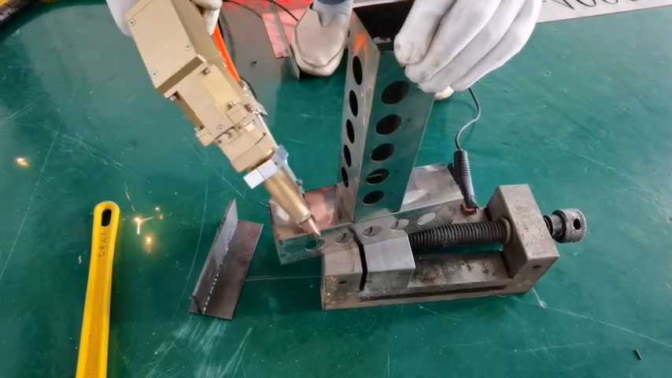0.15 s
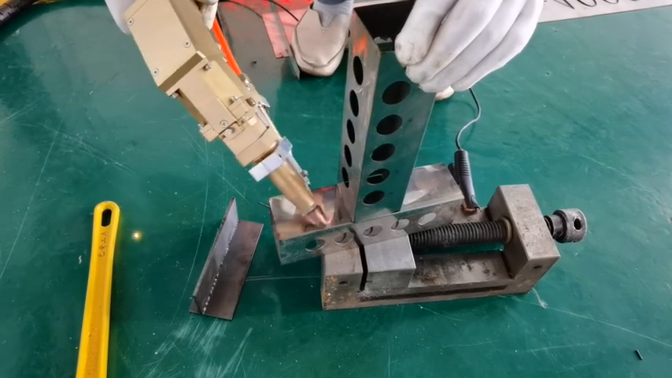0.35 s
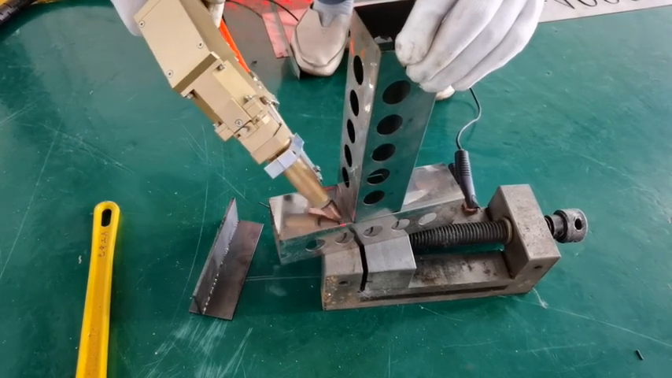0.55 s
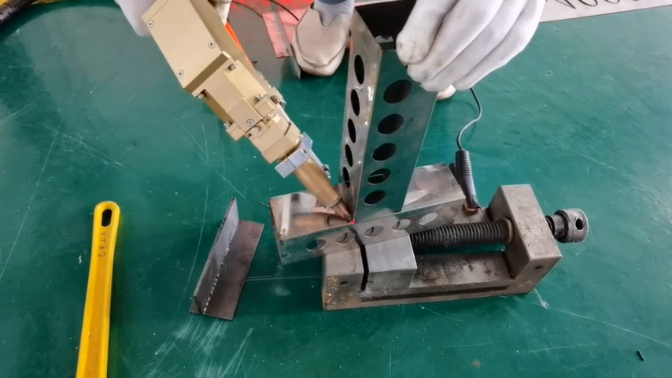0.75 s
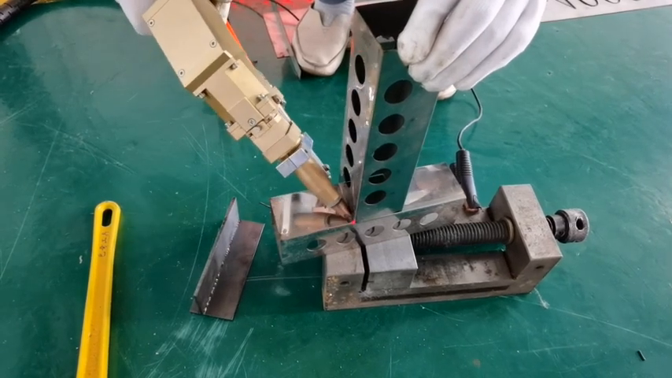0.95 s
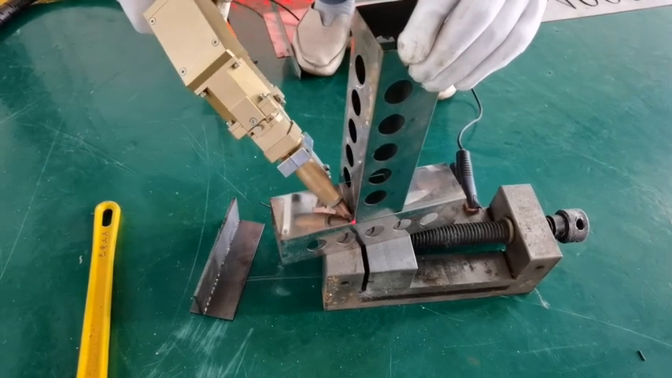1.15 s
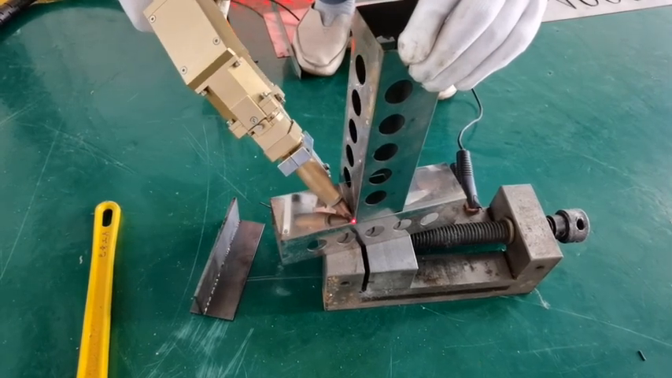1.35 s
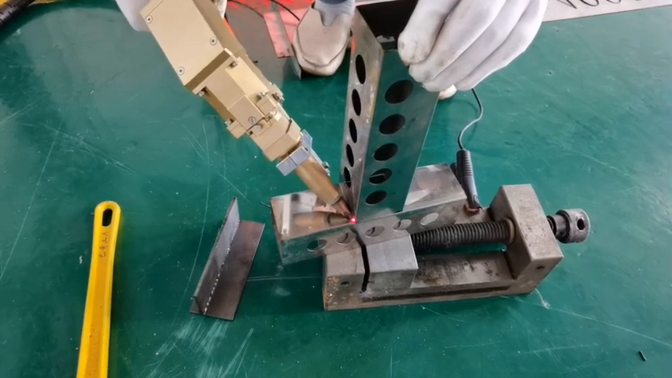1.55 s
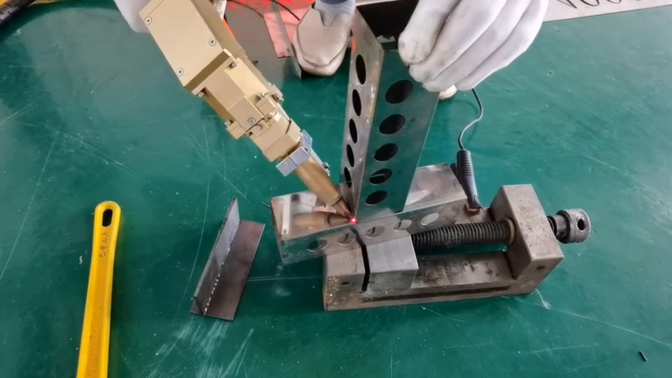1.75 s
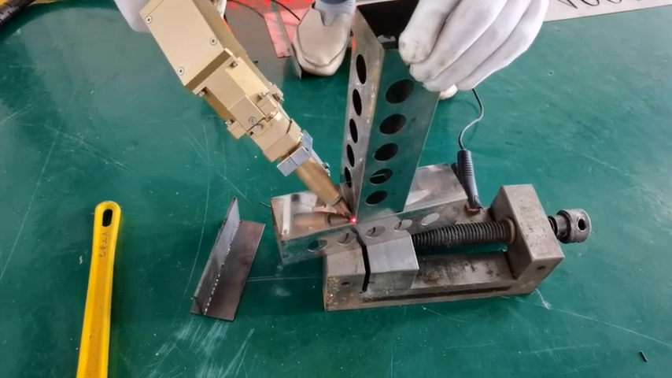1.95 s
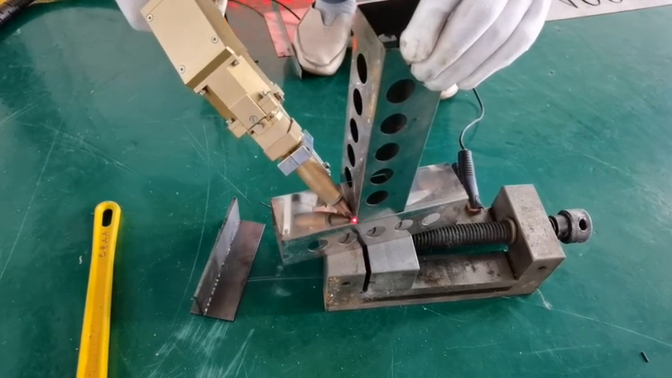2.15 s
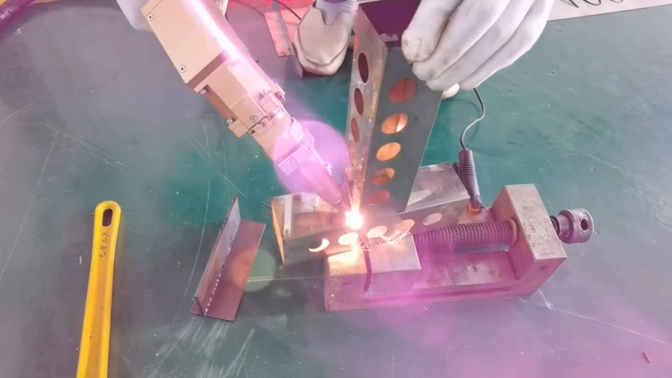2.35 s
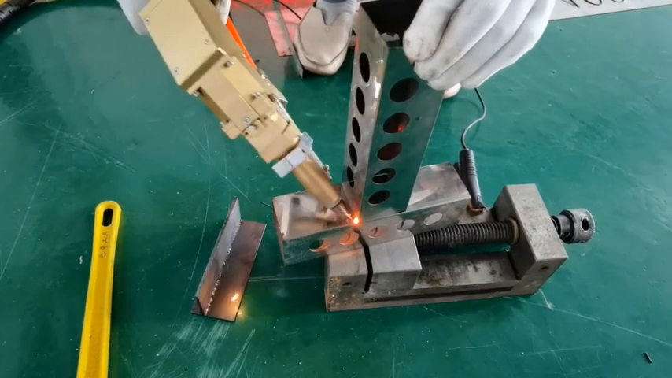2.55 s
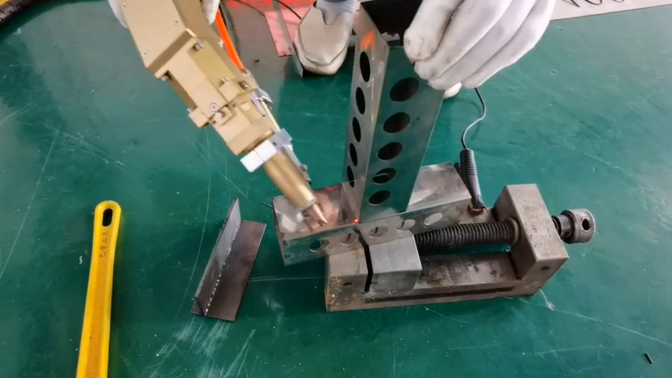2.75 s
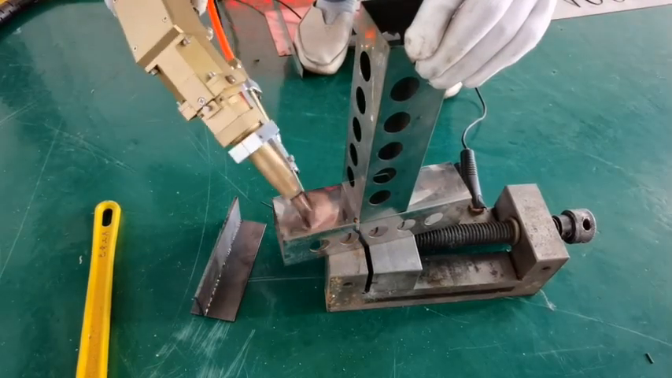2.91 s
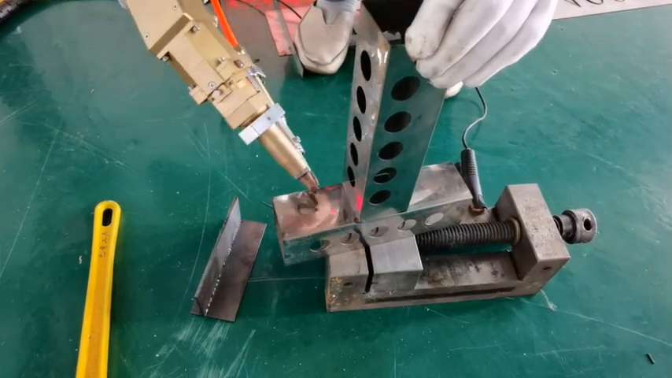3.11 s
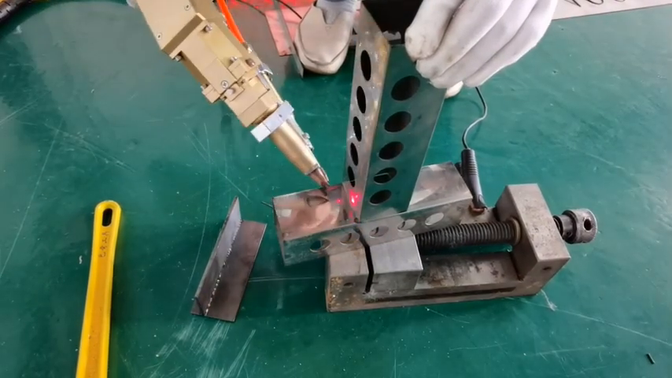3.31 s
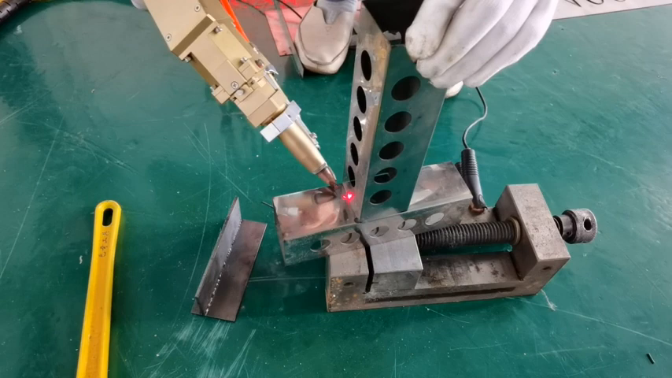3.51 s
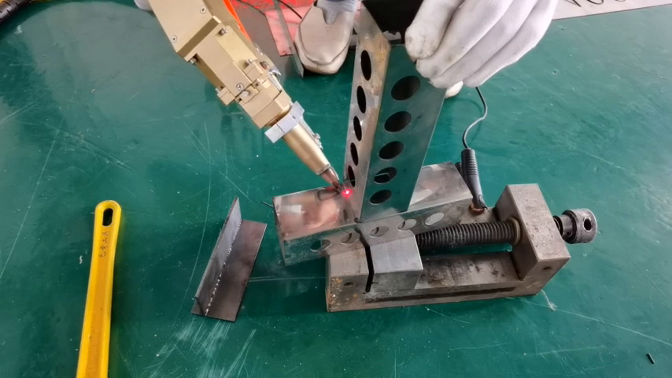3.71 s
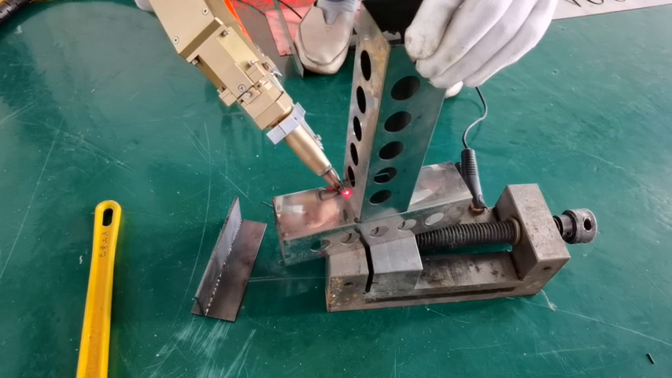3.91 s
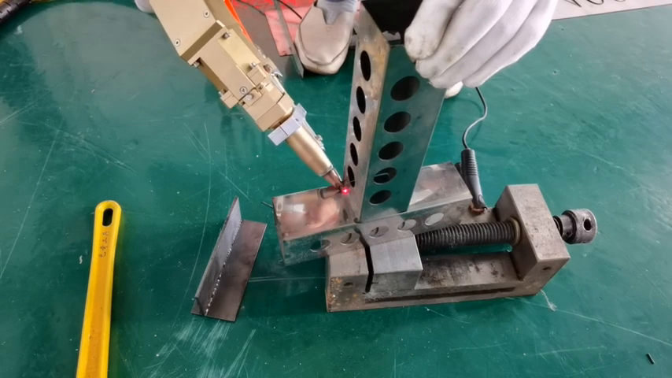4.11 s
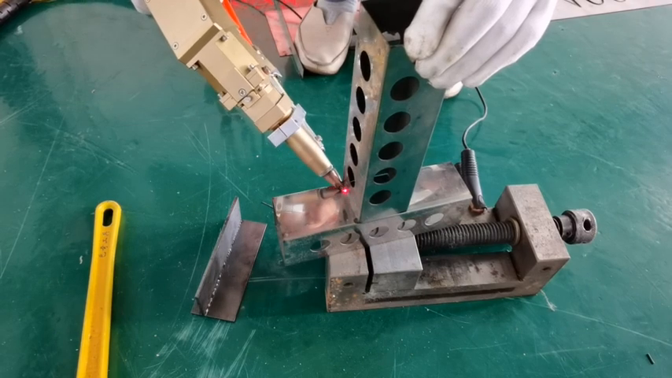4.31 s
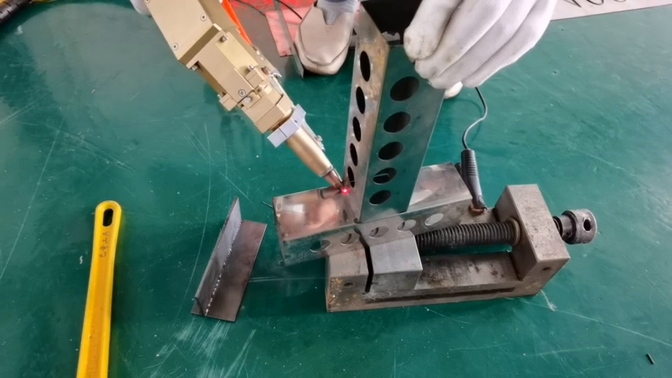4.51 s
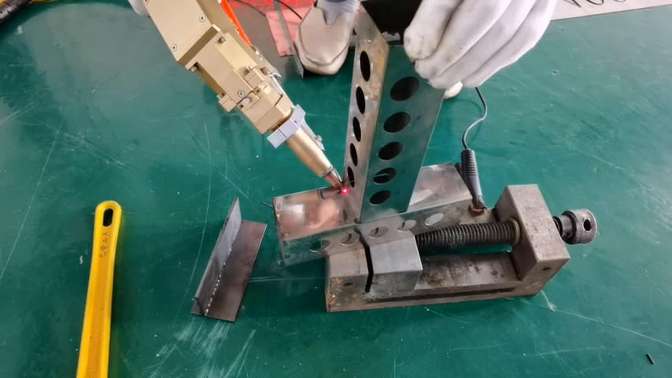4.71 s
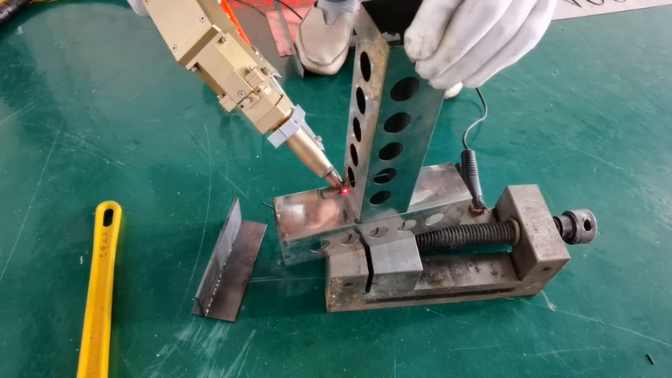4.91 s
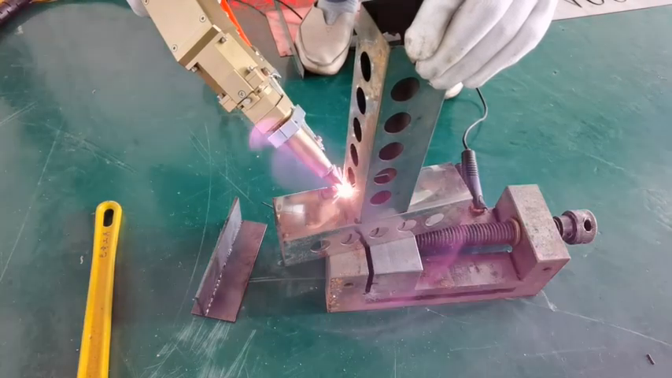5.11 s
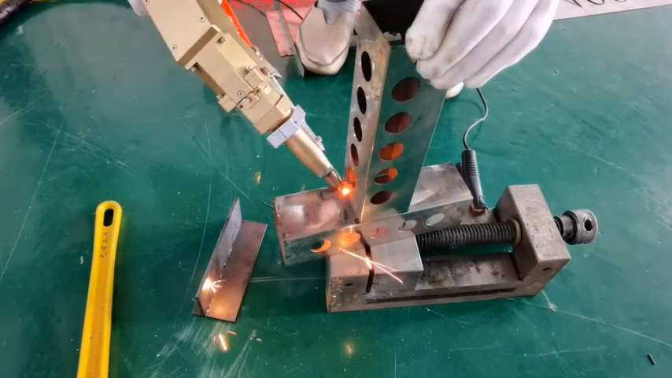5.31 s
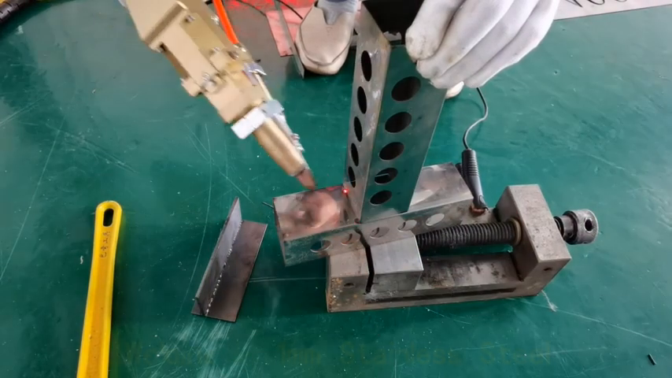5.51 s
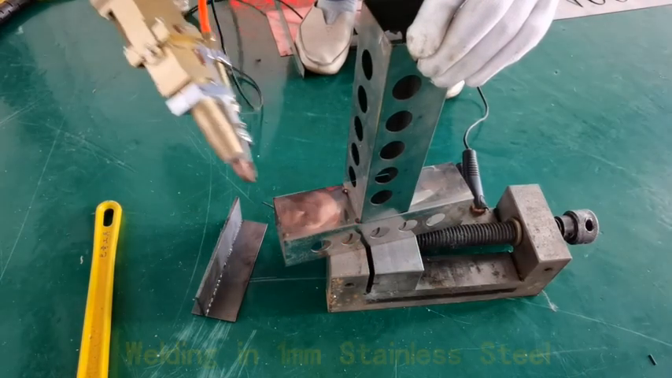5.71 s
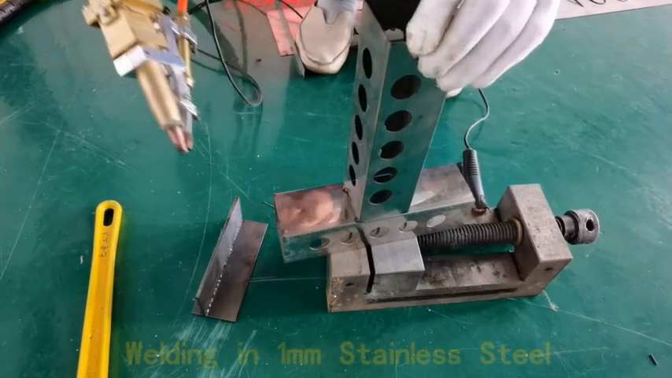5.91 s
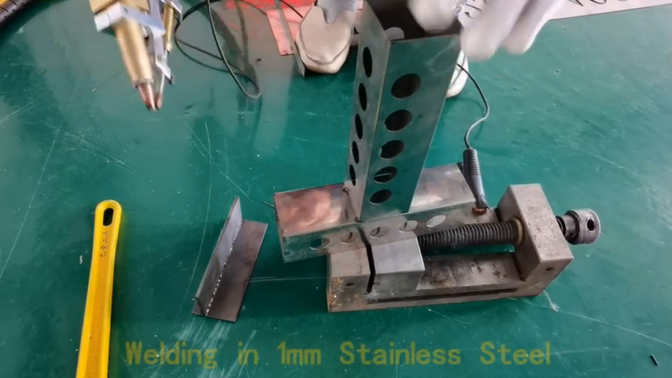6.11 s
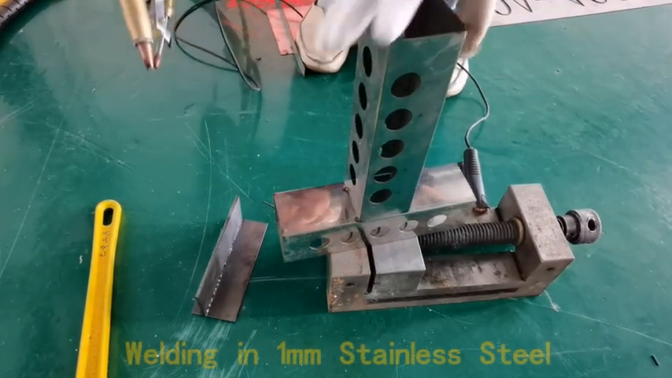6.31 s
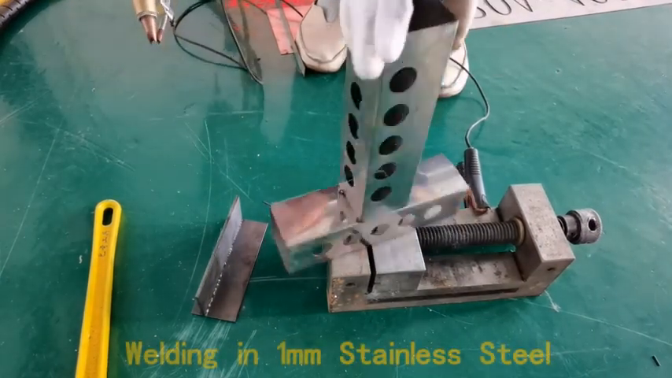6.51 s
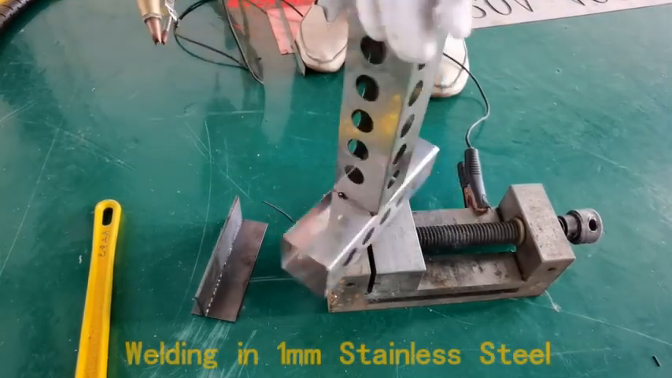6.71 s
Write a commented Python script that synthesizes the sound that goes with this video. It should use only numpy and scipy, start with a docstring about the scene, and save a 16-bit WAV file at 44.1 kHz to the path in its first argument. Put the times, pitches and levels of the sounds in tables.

```python
"""Laser tack welding in a workshop

A handheld laser welder makes two tacks between a steel tube and a plate, each a run of enveloped noise puffs,
about fifty a second: a thin sizzle, then a deeper roar with snaps of spatter. Filtered noise makes the
shielding gas and the machine rumble. The recorder ducks the room under each tack and stays turned down.
At the end the tube scrapes, groans and rings as it is lifted off the vice: random slips excite its modes."""
import sys
import numpy as np
from scipy import signal
from scipy.fft import rfft, irfft, next_fast_len
from scipy.io import wavfile
from scipy.ndimage import uniform_filter1d, map_coordinates

SR = 44100
rng = np.random.default_rng(int(sys.argv[2]) if len(sys.argv) > 2 else 0)


def unload_wav(signal):
    """Save mono or channel-first audio to the path in sys.argv[1] as 16-bit WAV at rate SR, clipped to [-1, 1]."""
    wavfile.write(
        sys.argv[1],
        SR,
        np.round(np.clip(np.atleast_2d(signal).T, -1, 1) * 32767).astype(np.int16),
    )


N = 297719
TIME = np.arange(N) / SR
FFT_SIZE = next_fast_len(N, real=True)
FREQS = np.maximum(np.fft.rfftfreq(FFT_SIZE, 1 / SR), 1)
# Colour tables are relative: each noise is scaled to rms 1. noise() also multiplies their freq_hz by pitch.


# Tack welds; simmer is the hiss between pulses, sizzle_pitch a frequency factor:
# start_s, pulse_rate_hz, level_db, simmer_db, simmer_peak_after_s, sizzle_pitch, singing_db, singing_lasts_s
TACKS = [(2.31, 50.2, 0, -2, 0.11, 0.985, -19.5, 0.2), (5.165, 53.9, 0, -5, 0.082, 0.956, -17.5, 0.2)]
# Laser pulses per tack: count
PULSE_COUNTS = (8, 9)
# Growth and decay of each vapour part as the melt deepens: peak_db, peak_after_s, rise_db_per_s, fall_db_per_s, boil_db
ROAR_COURSE = (-13, 0.19, 59, 20, 3)
SPIT_COURSE = (-8.3, 0.05, 290, 32, 2)
SIZZLE_COURSE = (-6, 0.2, 10, 57, 1.2)
# Vapour noise colours: freq_hz, density_db_per_hz
ROAR_COLOUR = [(700, -51), (950, -24), (1250, -20.5), (1700, -1.5), (2050, -7.5), (2400, 1), (3200, 1),
               (4200, 4.5), (5000, 0.5), (7500, -42)]
SPIT_COLOUR = [(3300, -12), (5300, 3), (6200, 2.5), (6700, 3.5), (8400, 3.5), (9700, 3.5), (11000, 11),
               (13200, -21), (15500, -1)]
SIZZLE_COLOUR = [(8000, -33), (10000, 3), (11100, 13.5), (12000, 8), (12600, 3), (13400, -7), (15800, -6)]
# Gap between nozzle and work, one list per tack as the tool is held differently: freq_hz, width_hz, lift_db
GAP_RESONANCES = [
    [(2050, 200, -7), (2740, 200, 7), (4340, 69, 9), (4650, 340, -7), (5530, 170, 4), (6270, 440, -14),
     (6750, 200, 9), (7800, 250, 5), (9700, 300, 0), (10400, 710, -16), (12600, 320, 5), (13300, 600, -6)],
    [(1590, 240, 1.5), (2080, 250, -11), (2350, 180, 5), (2960, 300, 1), (3900, 900, 3.5), (6700, 240, 6.5),
     (8850, 510, 7.5), (10000, 250, 0)],
]
# Weld turbulence: depth_db, band_hz, changes_per_s
WELD_PATCHES = (2.6, 450, 45)


def tacks(low_edge_hz=1050):
    """Each laser pulse blows a short vapour jet out of the melt; drops spatter out as well."""
    jets = 0
    for tack, count, resonances in zip(TACKS, PULSE_COUNTS, GAP_RESONANCES):
        start_s, rate_hz, level_db, simmer_db, simmer_s, sizzle_pitch, *_ = tack
        age_s = TIME - start_s
        roar = jet(age_s, ROAR_COURSE, noise(ROAR_COLOUR))
        spit = jet(age_s, SPIT_COURSE, noise(SPIT_COLOUR))
        sizzle = jet(age_s, SIZZLE_COURSE, noise(SIZZLE_COLOUR, sizzle_pitch))
        envelope = pulses(start_s, rate_hz, count, simmer_db, simmer_s)
        weld = from_db(level_db) * envelope * (roar + spit + sizzle) + spatter(start_s)
        jets = jets + nozzle_gap(weld, resonances)
    high_pass = signal.butter(4, low_edge_hz, "high", fs=SR, output="sos")
    return signal.sosfilt(high_pass, patchy(jets, *WELD_PATCHES))


def jet(age_s, course, hiss, boil_per_s=700):
    """One vapour part: its level follows the melt's course and boils unevenly."""
    *shape, boil_db = course
    return from_db(course_db(age_s, *shape) + boil_db * drift(boil_per_s)) * hiss


# Puff power time scales: rise_s, fall_s
PUFF_RISE_FALL_S = (.0032, .0032)
# Simmer build-up and fade: rise_db_per_s, fall_db_per_s
SIMMER_RISE_FALL_DB_PER_S = (91, 242)


def pulses(start_s, rate_hz, count, simmer_db, simmer_s, uneven_db=1.3):
    """Tack envelope: evenly spaced puffs, apart at first, run together by simmer in mid-tack, apart at the end."""
    times_s = start_s + np.arange(count) / rate_hz
    simmer_gain = from_db(course_db(TIME - start_s, simmer_db, simmer_s, *SIMMER_RISE_FALL_DB_PER_S))
    simmer_power = simmer_gain ** 2 * (TIME > start_s) * (TIME < times_s[-1])
    strengths = from_db(uneven_db * rng.standard_normal(count))
    puff_power = sum(g ** 2 * puff(s, *PUFF_RISE_FALL_S) for s, g in zip(times_s, strengths))
    return np.sqrt(simmer_power + puff_power)


# Melt drops: peak_s, level_db, fall_s, pitch_hz
SPATTERS = [(2.373, -18, 0.0018, 3700), (2.393, -12.5, .003, 3520), (2.435, -7, 0.0023, 1400),
            (2.447, -8.5, .002, 4170), (2.46, -7, 0.0041, 5000), (5.164, -19.5, 0.0065, 3940),
            (5.217, -18.5, 0.0019, 1600), (5.245, -14, 0.003, 4280), (5.257, -9.5, 0.0039, 1250),
            (5.277, -4, 0.0022, 3760), (5.298, -7, .0025, 3260), (5.318, -6.5, 0.0027, 2450)]
# Spatter colour: freq_hz, density_db_per_hz
SPATTER_COLOUR = [(800, -48), (1250, -3), (2000, -10.5), (2500, -2.5), (4000, -3), (5400, -0.5),
                  (6800, -4.5), (9000, -3.5), (15000, -3)]


def spatter(start_s, swell_s=0.002, crackle_db=4, width_hz=450, lift_db=7):
    """Drops burst out of the melt: short ragged noise snaps, each with its own resonance."""
    crackle = from_db(crackle_db * drift(1500)) * noise(SPATTER_COLOUR)
    snaps = 0
    for peak_s, level_db, fall_s, pitch_hz in SPATTERS:
        if abs(peak_s - start_s) < 1:   # drops of this tack only
            snap = from_db(level_db) * np.sqrt(puff(peak_s, swell_s, fall_s)) * crackle
            snaps = snaps + nozzle_gap(snap, [(pitch_hz, width_hz, lift_db)])
    return snaps


def nozzle_gap(x, resonances):
    """Parallel resonances: the air gap lifts a few pitches and cancels others."""
    out = x
    for hz, width_hz, lift_db in resonances:
        band = signal.lfilter(*signal.iirpeak(hz, hz / width_hz, fs=SR), x)
        out = out + (from_db(lift_db) - 1) * band
    return out


# Flares of the singing after the first tack: peak_s, level_db, width_s
FLARES = [(2.508, -20, .004), (2.533, -19.5, .008)]
# Singing colour: freq_hz, density_db_per_hz
SING_COLOUR = [(3000, -29), (3900, -15), (4350, -16), (4900, -28), (6500, -18), (9200, -21), (10300, -15),
               (10750, -19.5), (11100, 1.5), (11600, 1), (12200, -7), (13400, -30), (15000, -3),
               (15800, -31)]
# Singing turbulence: depth_db, band_hz, changes_per_s
SING_PATCHES = (2.5, 500, 70)


def singing(full_after_s=0.0071, rise_db_per_s=264, sag_db_per_s=3, fall_db_per_s=300):
    """Thin high hiss at the weld spot: fades in quickly, outlasts the tack, flares up after the first."""
    shape = sum(from_db(db) * np.sqrt(puff(s, width_s, width_s)) for s, db, width_s in FLARES)
    for start_s, *_, singing_db, lasts_s in TACKS:
        age_s = TIME - start_s
        held_db = course_db(age_s, singing_db, full_after_s, rise_db_per_s, sag_db_per_s)
        shape = shape + from_db(held_db - fall_db_per_s * np.maximum(age_s - lasts_s, 0))
    return shape * rms_one(patchy(noise(SING_COLOUR), *SING_PATCHES))


# Dull trigger knock and ignition snap, ahead of each tack: lead_s, level_db, decay_s
TRIGGER = (.083, -42, 0.046)
IGNITION = (0.00308, -20.5, 0.002)
# Click colour: freq_hz, density_db_per_hz
CLICK_COLOUR = [(400, 2), (800, 6), (1200, 7), (1650, 3), (2200, 5), (5000, -35), (12000, -35)]


def clicks():
    """Trigger and beam ignition: noise bursts with instant onset and exponential decay."""
    shape = 0
    for start_s, *_ in TACKS:
        for lead_s, level_db, decay_s in (TRIGGER, IGNITION):
            age_s = TIME - (start_s - lead_s)
            shape = shape + from_db(level_db) * (age_s >= 0) * np.exp(-np.maximum(age_s, 0) / decay_s)
    return shape * noise(CLICK_COLOUR)


# Drag off the vice, before the gains in tube(): time_s, scrape_rel_db, groan_rel_db
DRAG = [(6.46, -58, -71), (6.482, -39, -63), (6.504, -47, -53), (6.522, -40, -45), (6.59, -45, -46),
        (6.655, -59, -41), (6.695, -47, -50), (6.725, -70, -41), (6.75, -64, -46)]
# Squeaks as the tube breaks loose: peak_s, level_db, rise_s, fall_s, from_hz, to_hz
SQUEAKS = [(6.527, -35.5, 0.007, 0.0067, 2050, 1730), (6.555, -42.5, 0.016, 0.013, 2385, 2370),
           (6.58, -39, 0.011, .028, 1930, 1935)]
# Tube modes: freq_hz, rel_db, t60_s
TUBE_MODES = [(1405, -14, 0.22), (1630, 0, 0.05), (1710, -5, 0.035), (1800, -7, 0.28), (1880, -4, .06),
              (1940, -4, 0.46), (1970, -7, 0.056), (2385, -16, 0.09)]
# Low tube modes, the first two a close pair that beats: freq_hz, rel_db, t60_s
GROAN_MODES = [(504.4, 0.5, 0.29), (533, 0.5, 0.33), (1040, -20, .1)]


def tube(slips_per_s=1500, scrape_db=-12, groan_db=6, spread=0.41, catch_db=3, shudder_db=2.0):
    """Steel stick-slip: uneven slips make the tube modes ring and groan, regular ones squeak."""
    scrape, groan = level(DRAG)
    slips = (rng.random(N) < slips_per_s / SR) * from_db(catch_db * drift(60))
    ringing = 0
    for hz, db, t60_s in TUBE_MODES:
        strength = rng.standard_normal(N) + spread * rng.standard_normal((2, N))   # shared + per side
        ringing = ringing + ring(slips * strength * scrape * from_db(scrape_db + db), hz, t60_s)
    low = 0
    for hz, db, t60_s in GROAN_MODES:
        low = low + from_db(db) * rms_one(ring(slips * rng.standard_normal(N), hz, t60_s))
    tones = groan * from_db(groan_db - meter_db(low[None], .04)) * low   # levelled, then shaped by DRAG
    for s, db, rise_s, fall_s, from_hz, to_hz in SQUEAKS:
        hz = np.interp(TIME, [s - 2 * rise_s, s + 2 * fall_s], [from_hz, to_hz])
        tones = tones + from_db(db) * np.sqrt(puff(s, rise_s, fall_s)) * glide(hz, rough=0.0194)
    shuddering = tones[None] * from_db(shudder_db * drift(130))
    return ringing + reflections(shuddering, t60_s=0.13, wet_db=-8)


def glide(hz, rough):
    """Stick-slip tone: a sine with trembling pitch; rms 1."""
    cycles = np.cumsum(hz * (1 + rough * drift(400))) / SR
    return np.sqrt(2) * np.sin(2 * np.pi * cycles)


# Gas colour: freq_hz, density_db_per_hz
GAS_COLOUR = [(900, -13), (1500, -18), (2100, -12.5), (3000, -8.5), (4400, -4), (4800, -9), (5400, -6.5),
              (6400, -1.5), (7500, 0), (8500, -4), (10500, -3), (12500, -5), (13200, -8.5), (15800, -5)]
# Gas turbulence: depth_db, band_hz, changes_per_s
GAS_PATCHES = (2, 300, 25)
# Faint high gas whistles: peak_s, level_db, width_s
WHISTLES = [(1.85, -54, .05), (5.445, -30, .014), (5.72, -46, .05)]
# Whistle colour: freq_hz, density_db_per_hz
WHISTLE_COLOUR = [(14200, -29), (14720, -7), (14850, 0), (14980, -12), (15400, -40)]
# Left-right likeness of the room, also used by machines(): freq_hz, correlation (-1..1)
ROOM_LIKENESS = [(60, 1), (130, 0.96), (290, 0.9), (640, 0.53), (1300, -0.6), (2500, 0.018),
                 (15000, -0.044)]


def gas(gas_db=-30.5, flutter_db=0.5):
    """Steady turbulent shielding gas flow spread through the hall, with brief narrow-band whistles."""
    flow = reflections(coloured(GAS_COLOUR, ROOM_LIKENESS), t60_s=.5, wet_db=-3)
    shape = sum(from_db(db) * np.sqrt(puff(s, width_s, width_s)) for s, db, width_s in WHISTLES)
    whistle = shape * noise(WHISTLE_COLOUR, pitch=1)
    hiss = from_db(gas_db + flutter_db * drift(25)) * rms_one(patchy(flow, *GAS_PATCHES))
    return hiss + stereo_width(whistle)


# Rumble level: time_s, level_db
RUMBLE = [(0, -35), (1.2, -36), (1.72, -34.5), (2.15, -35), (2.55, -32.5), (3.3, -34.5), (4.8, -33.5),
          (6.2, -34.5)]
# Rumble colour: freq_hz, density_db_per_hz
RUMBLE_COLOUR = [(20, -16), (38, -6.5), (60, -6), (100, -1), (135, -7), (185, 0), (240, -12.5), (310, -11),
                 (420, -19), (680, -23), (900, -30.5), (1400, -28.5), (3000, -56)]
# Machine hums, level against the broad rumble: freq_hz, half_width_hz, rel_db, swell_db
HUMS = [(113, 8.5, -7, 1.5), (183.7, 15, -8.5, 3), (280.6, 9.7, -8.5, 2), (1039, 33.5, -19, 4)]
# Surges of the deep drone: peak_s, level_db, width_s
SURGES = [(.5, -29, 0.041), (1.72, -30.5, 0.051), (4.15, -37, 0.17), (4.55, -34.5, 0.17),
          (4.85, -32, 0.034)]
# Surge colour: freq_hz, density_db_per_hz
SURGE_COLOUR = [(55, -23), (85, 3.5), (110, 5), (140, -10.5), (185, -5), (260, -19.5), (450, -44)]


def machines():
    """Fans and pumps: broad rumble, narrow-band hums that swell and fade, a deep surging drone."""
    sound = coloured(RUMBLE_COLOUR, ROOM_LIKENESS)
    for hz, half_width_hz, db, swell_db in HUMS:
        peak = 1 / (1 + ((FREQS - hz) / half_width_hz) ** 2)
        sound = sound + from_db(db + swell_db * drift(11)) * stereo_noise(peak, ROOM_LIKENESS)
    surge_power = sum(from_db(db) ** 2 * puff(s, width_s, width_s) for s, db, width_s in SURGES)
    rumble_gain = from_db(np.interp(TIME, *np.transpose(RUMBLE)))
    return rumble_gain * sound + np.sqrt(surge_power) * coloured(SURGE_COLOUR, ROOM_LIKENESS)


def from_db(db):
    """Decibels to gain."""
    return 10 ** (np.asarray(db) / 20)


def rms_one(x):
    """Scale to unit rms."""
    return x / np.sqrt(np.mean(x ** 2) + 1e-20)


def level(rows):
    """Gain curves from rows (time_s, db, ..), silent before the first and 10 ms after the last."""
    s, *columns = np.transpose(rows)
    active = (TIME >= s[0]) * (TIME <= s[-1] + .01)
    return [from_db(np.interp(TIME, s, db)) * active for db in columns]


def course_db(age_s, peak_db, peak_s, rise_db_per_s, fall_db_per_s):
    """Level that climbs linearly in dB to its peak and falls again."""
    return peak_db - rise_db_per_s * np.maximum(peak_s - age_s, 0) - fall_db_per_s * np.maximum(age_s - peak_s, 0)


def puff(peak_s, rise_s, fall_s):
    """Power of one puff: squared hyperbolic secant around its peak."""
    scale_s = np.where(TIME < peak_s, rise_s, fall_s)
    return 1 / np.cosh(np.clip((TIME - peak_s) / scale_s, -20, 20)) ** 2


def drift(rate_hz):
    """Random curve with rate_hz new values a second, linearly joined; rms 1."""
    knots = rng.standard_normal(N // 8)
    return rms_one(np.interp(TIME * rate_hz, np.arange(len(knots)), knots))


def at_hz(points):
    """Read a (freq_hz, value) table on a log-frequency axis."""
    hz, value = np.transpose(points)
    return np.interp(np.log(FREQS), np.log(hz), value)


def noise(colour, pitch=0.95):
    """Mono noise with a spectrum whose frequencies are multiplied by pitch; rms 1."""
    shifted = [(hz * pitch, db) for hz, db in colour]
    white = rfft(rng.standard_normal(2 * (len(FREQS) - 1)))
    return rms_one(irfft(from_db(at_hz(shifted)) * white)[:N])


def stereo_noise(gain, likeness):
    """Stereo noise with gain and left-right correlation per frequency; rms 1."""
    mid, side = rfft(rng.standard_normal((2, 2 * (len(FREQS) - 1))))
    alike = np.clip(at_hz(likeness), -1, 1)
    left_right = np.sqrt(1 + alike) * mid + np.sqrt(1 - alike) * side * [[1], [-1]]
    return rms_one(irfft(gain * left_right)[:, :N])


def coloured(colour, likeness):
    """Stereo noise following a colour table."""
    return stereo_noise(from_db(at_hz(colour)), likeness)


def patchy(x, depth_db, band_hz, changes_per_s):
    """Turbulence: neighbouring bands swell and fade each on their own."""
    hz, s, cells = signal.stft(x, SR, nperseg=256)
    chance = rng.standard_normal((128, 1024))
    grid = np.meshgrid(hz / band_hz, s * changes_per_s, indexing="ij")
    swell = map_coordinates(chance, grid, order=1, mode="mirror")
    return signal.istft(cells * from_db(depth_db * swell), SR)[1][..., :N]


def ring(strikes, hz, t60_s):
    """One struck mode: a two-pole resonator."""
    radius = from_db(-60 / (t60_s * SR))
    w = 2 * np.pi * hz / SR
    return signal.lfilter([0, np.sin(w)], [1, -2 * radius * np.cos(w), radius ** 2], strikes + 1e-18)


def reflections(x, t60_s, wet_db):
    """Add a dense decaying cloud of echoes, independent on each side."""
    cloud = rng.standard_normal((2, SR // 2)) * from_db(-60 * TIME[:SR // 2] / t60_s)
    cloud /= np.sqrt(np.sum(cloud ** 2, axis=1, keepdims=True))
    return x + from_db(wet_db) * signal.fftconvolve(x, cloud, axes=1)[:, :N]


# Phase difference between left and right: freq_hz, phase_rad
STEREO_PHASE = [(200, 0.5), (1900, 0.43), (2700, 3.5), (3400, 1.15), (4500, 1), (6200, 1), (7100, 2),
                (8000, 3.5), (9000, 7.5), (10100, 3.5), (11200, 4.5), (12100, 4.5), (15000, 4)]


def stereo_width(x):
    """Stereo width: a left-right phase difference that varies with frequency, half on each side."""
    phase_rad = np.interp(FREQS, *np.transpose(STEREO_PHASE))
    spectrum = rfft(x, 2 * (len(FREQS) - 1))
    return irfft(spectrum * np.exp(.5j * phase_rad * [[1], [-1]]))[:, :N]


def meter_db(x, window_s):
    """Running mean power over all channels, in dB."""
    power = uniform_filter1d(np.mean(x ** 2, axis=0), int(window_s * SR))
    return 10 * np.log10(np.maximum(power, 1e-12))


def scene():
    """Weld and tube in the hall, with gas and machines."""
    weld = stereo_width(tacks() + singing() + clicks())
    weld = reflections(weld, t60_s=0.05, wet_db=-4)   # floor and vice
    weld = reflections(weld, t60_s=0.49, wet_db=-19.0)   # hall
    return weld + tube() + gas() + machines() * from_db([[.4], [-.4]])   # machines slightly left


def gain_control(x, threshold_db=-22, knee_db=4, back_off_db_per_s=16, recover_db_per_s=0.36):
    """Slow gain control: wound down while the sound is loud, creeping back very slowly."""
    loud = np.clip((meter_db(x, 0.0063) - threshold_db) / knee_db, 0, 1)
    wound_db = np.cumsum(back_off_db_per_s * loud - recover_db_per_s) / SR
    return x * from_db(np.minimum.accumulate(wound_db) - wound_db)   # gain never above 0 dB


def record(dry, threshold_db=-25, slope=0.39, release_db_per_s=200, window_s=0.0069, ceiling=0.87,
           cutoff_hz=15650):
    """Recorder: slow gain control, fast limiter that ducks under the tacks, rounded peaks, top cut."""
    sound = gain_control(dry)
    over_db = np.maximum(meter_db(sound, window_s) - threshold_db, 0)
    release_db = release_db_per_s * TIME
    held_db = np.maximum.accumulate(over_db + release_db) - release_db
    limited = sound * from_db(-slope * uniform_filter1d(held_db, int(2 * window_s * SR)))
    rounded = ceiling * np.tanh(limited / ceiling)
    low_pass = signal.ellip(12, .1, 90, cutoff_hz, fs=SR, output="sos")
    return signal.sosfilt(low_pass, rounded)


dry = scene()
out = record(dry)
unload_wav(out)
```